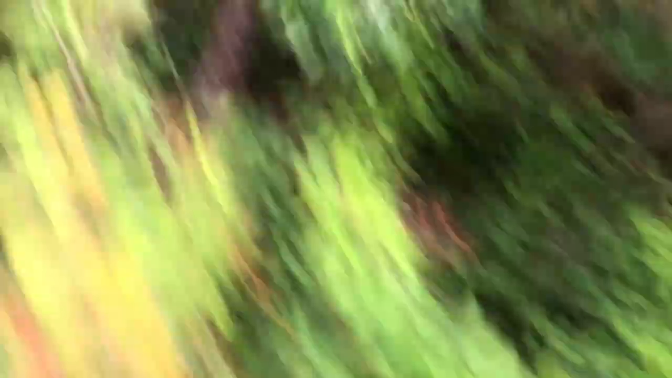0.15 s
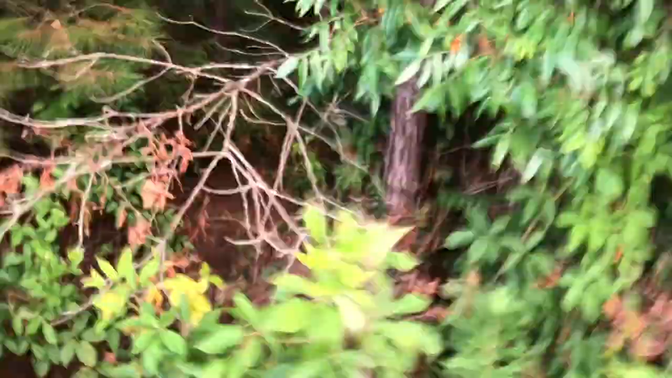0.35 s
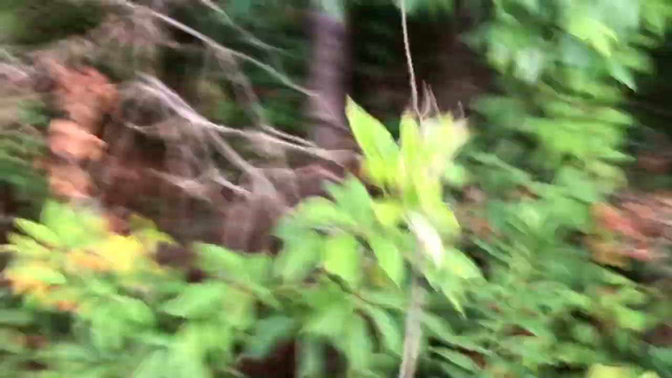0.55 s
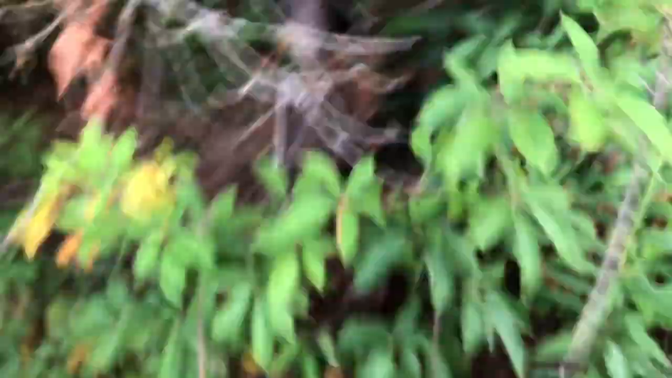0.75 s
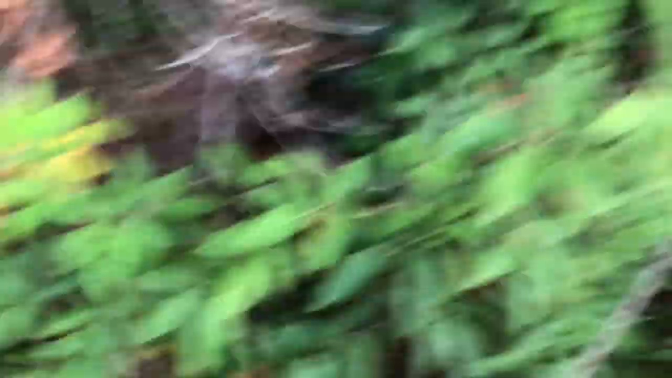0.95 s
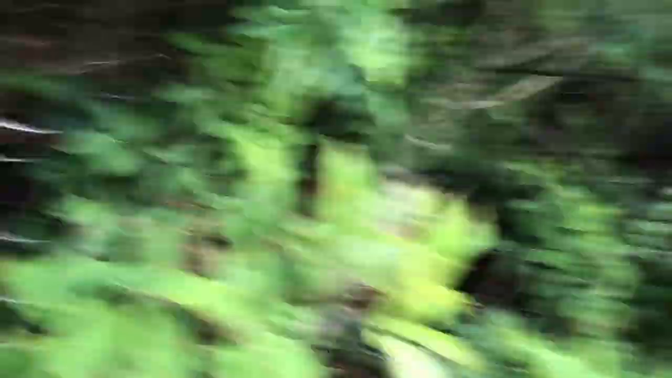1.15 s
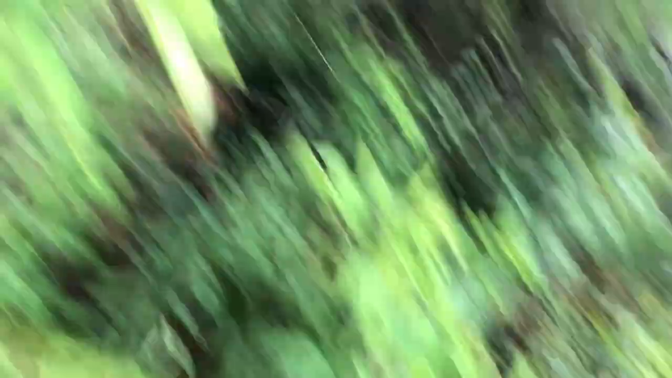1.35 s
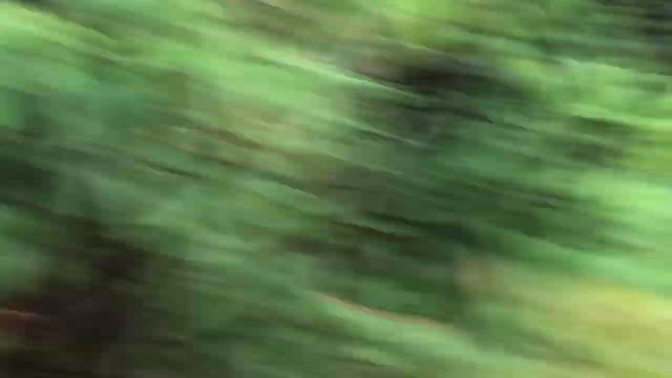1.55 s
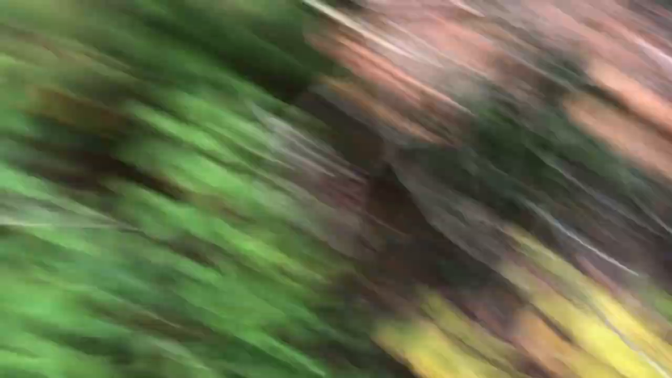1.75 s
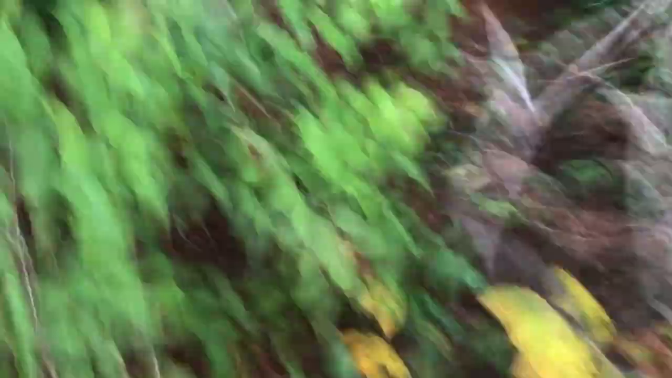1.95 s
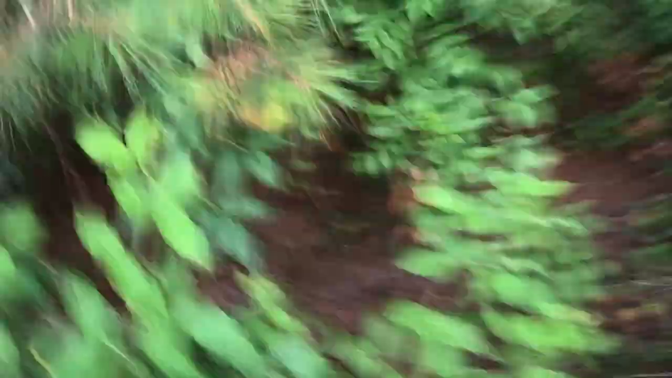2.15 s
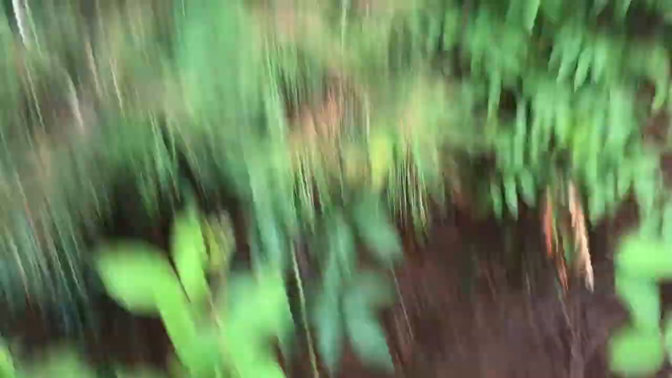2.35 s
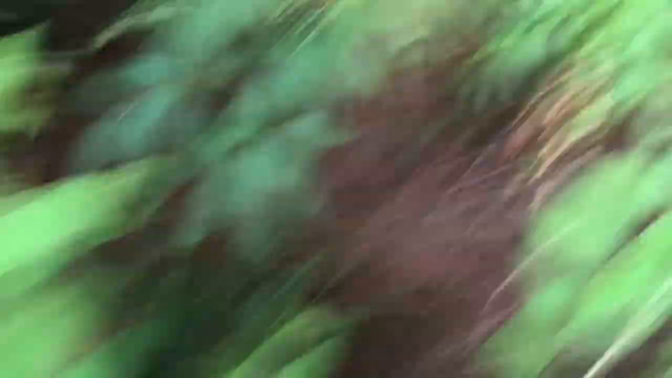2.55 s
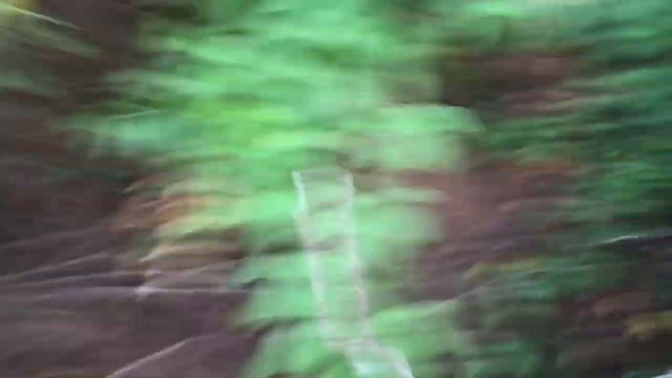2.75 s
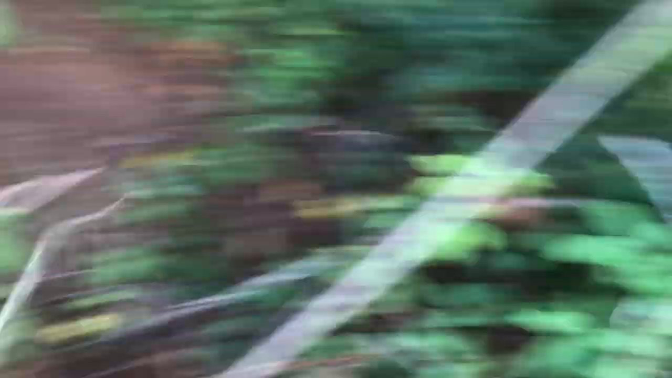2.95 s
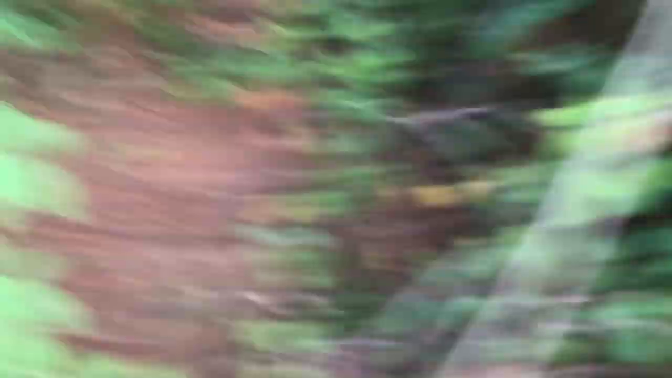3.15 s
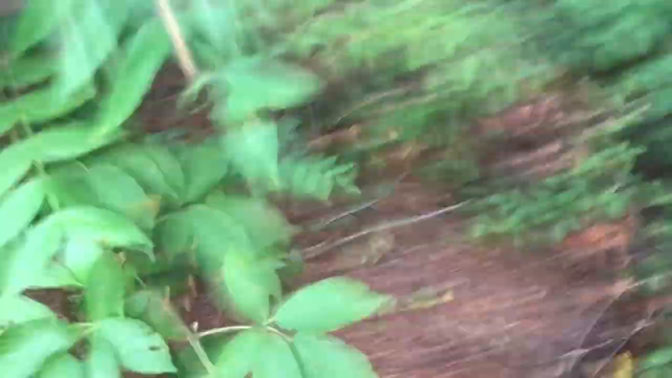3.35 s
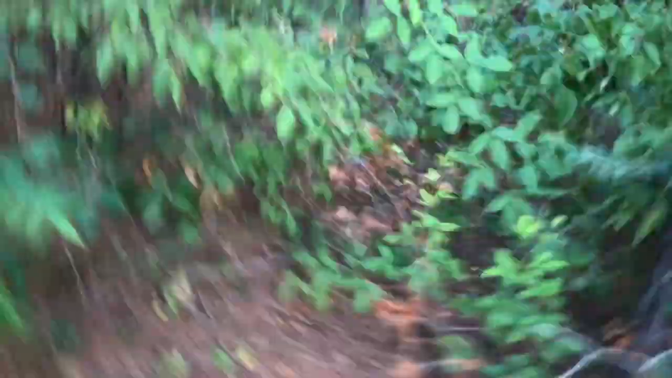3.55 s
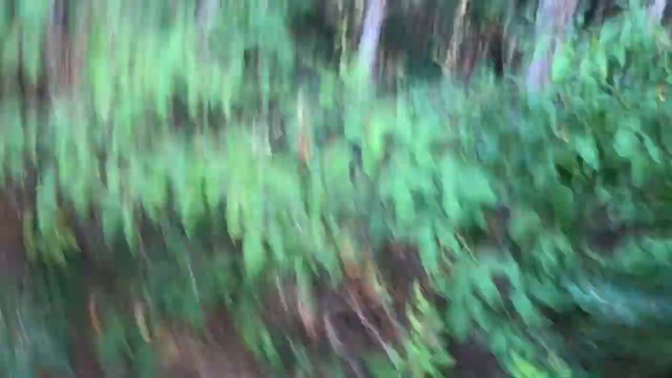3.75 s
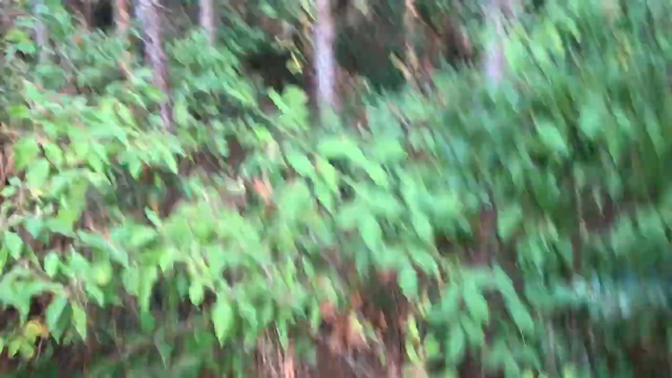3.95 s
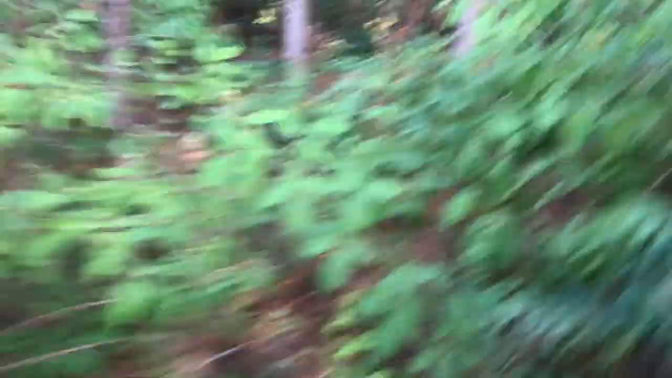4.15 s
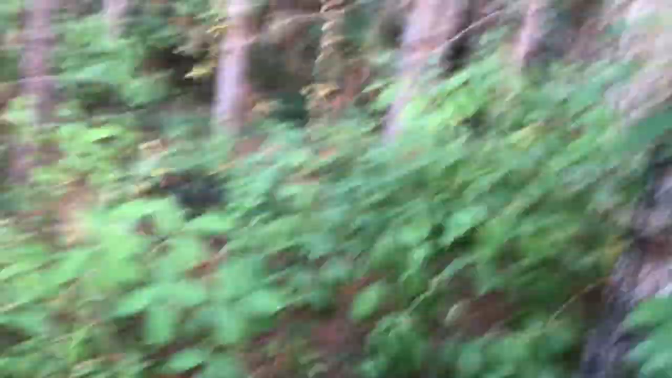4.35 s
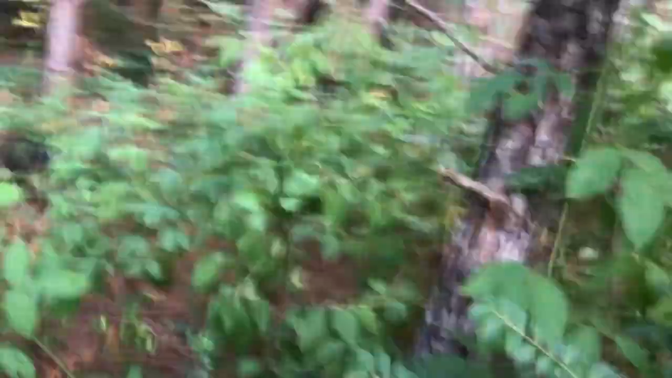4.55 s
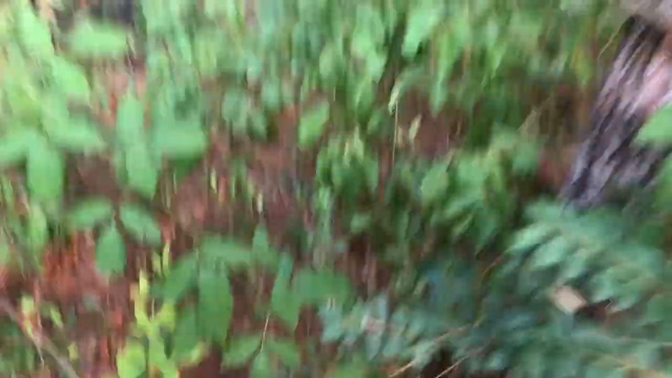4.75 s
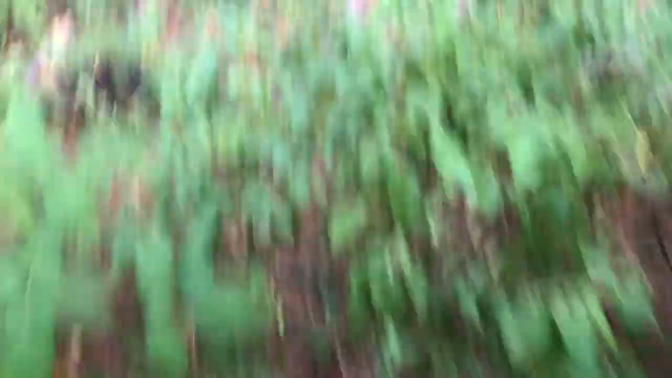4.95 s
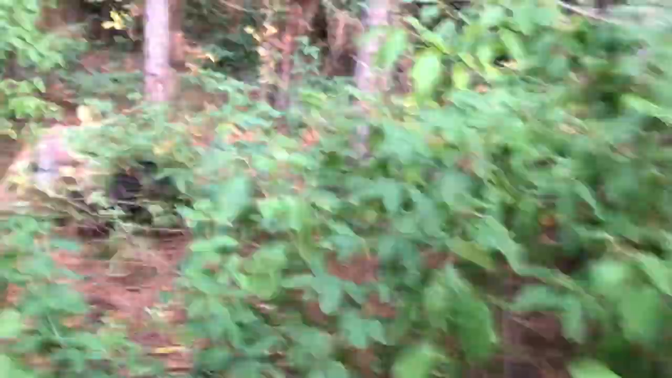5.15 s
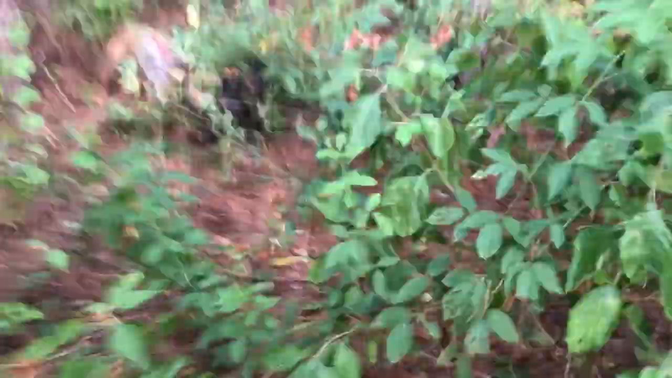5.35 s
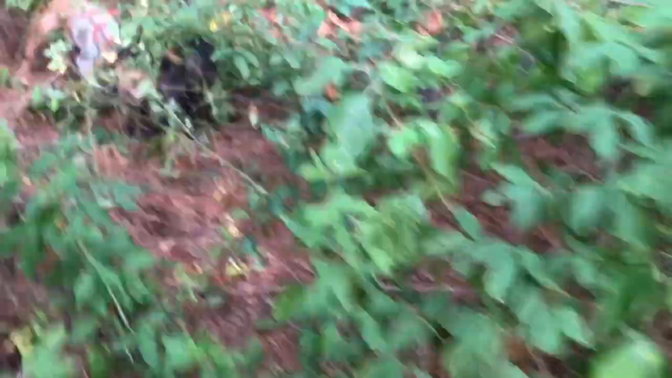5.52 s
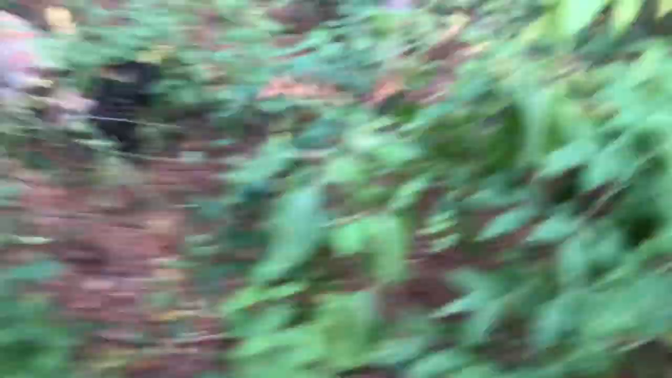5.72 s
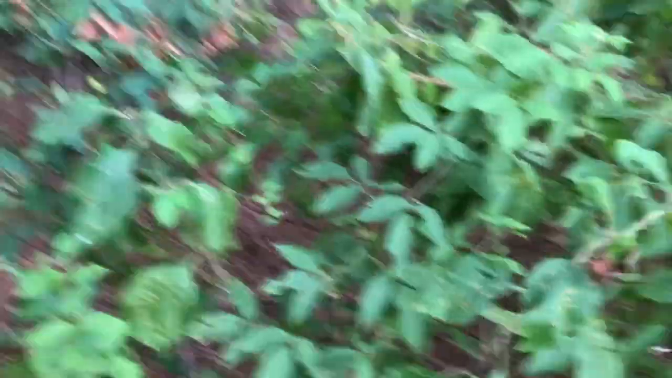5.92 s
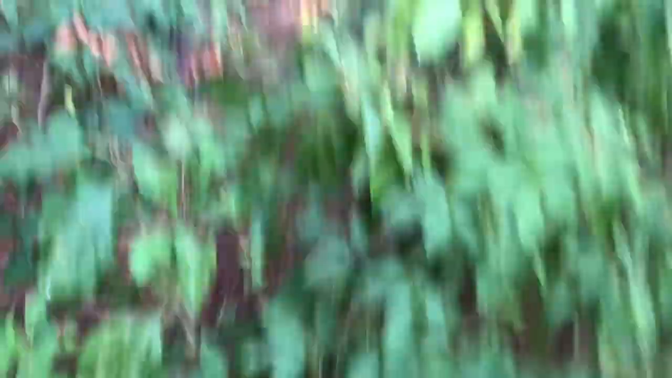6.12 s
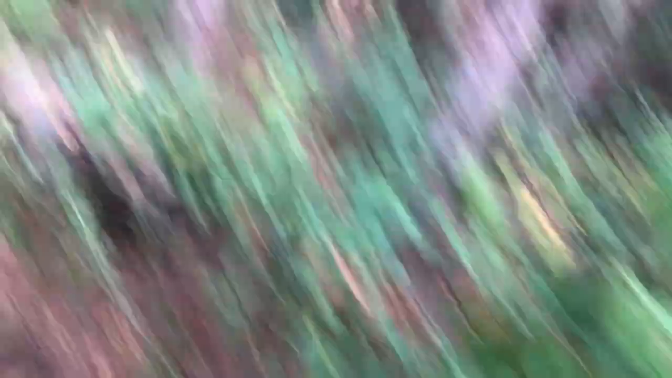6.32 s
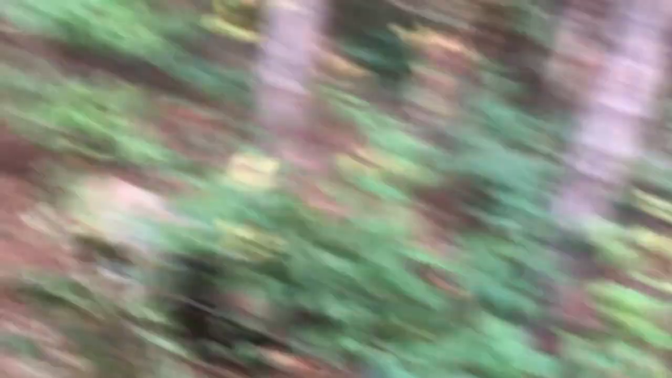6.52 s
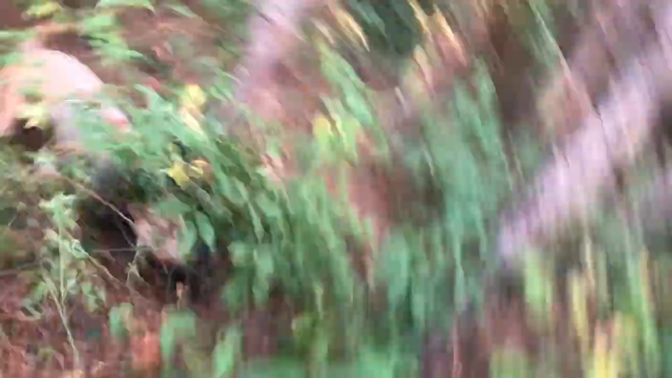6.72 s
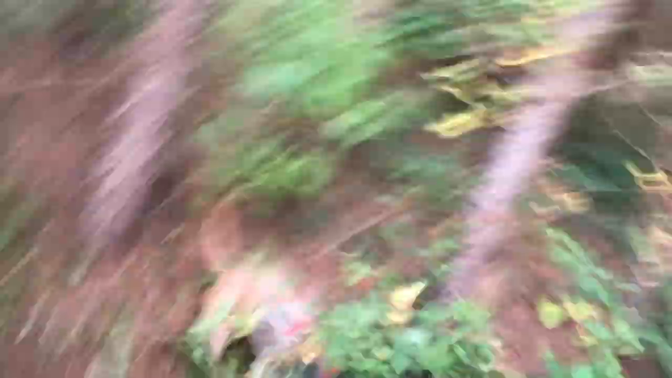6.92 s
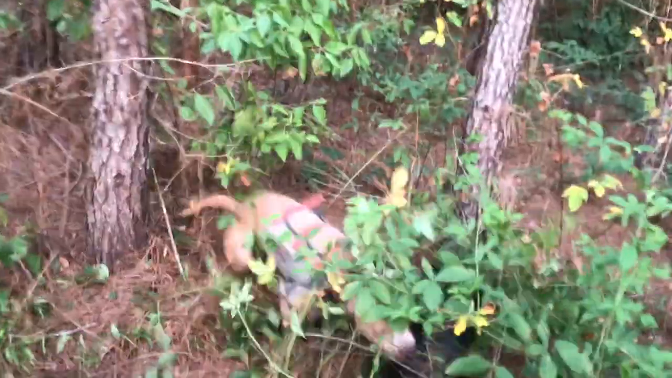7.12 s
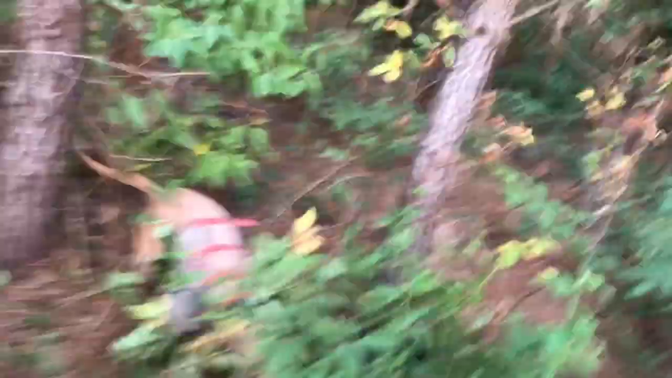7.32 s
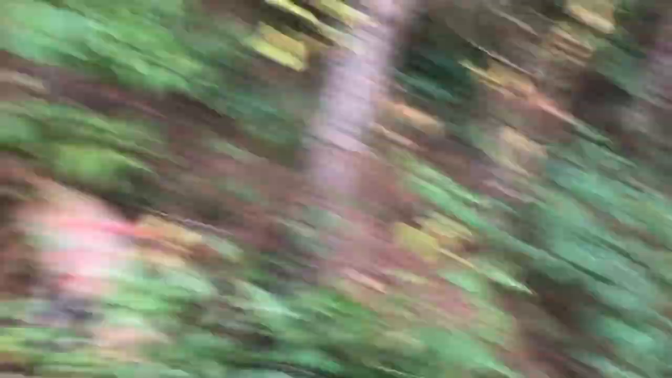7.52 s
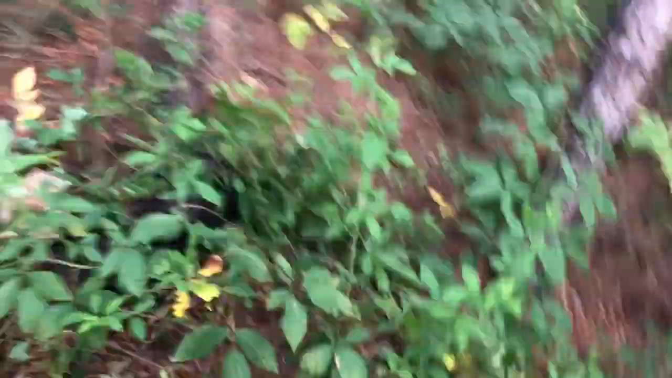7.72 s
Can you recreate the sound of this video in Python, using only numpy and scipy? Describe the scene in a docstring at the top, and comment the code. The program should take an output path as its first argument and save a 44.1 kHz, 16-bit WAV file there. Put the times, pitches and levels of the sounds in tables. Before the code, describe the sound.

Outdoors in a wood, someone pushes through leafy undergrowth with swishes, sharp snaps and low thuds near the microphone. A little further off a held pig screams in four long bursts, a shrill whistle roughened by fluttering rasp and breath. The cries grow more intense, the brush noise thins out, and the last squeal is still going at the end. Faint reflections come off the trunks.

```python
"""The harsh tail of a cry and the rustle of brush come first, then snapping twigs, dull knocks and low thuds.
A held wild hog squeals four more times in a wood: a high whistle of the vocal folds beats against a
slower, uneven flutter, over breath noise shaped by throat resonances. Slow fold slaps open the third squeal.
Brush is shaped noise and small clicks, snaps are noise bursts, knocks are short decaying sines;
sparse taps echo the hog off the trunks."""
import sys
import numpy as np
from scipy import signal
from scipy.fft import rfft, irfft
from scipy.io import wavfile
from scipy.ndimage import uniform_filter1d

SR = 44100
rng = np.random.default_rng(int(sys.argv[2]) if len(sys.argv) > 2 else 0)


def generate_wav(sig):
    """Save sig (samples, or channels by samples) to the path in sys.argv[1] as 16-bit PCM at SR."""
    pcm = np.round(np.clip(np.atleast_2d(sig).T, -1, 1) * 32767).astype(np.int16)
    wavfile.write(sys.argv[1], SR, pcm)


N = 347508  # length in samples

# Tail of an earlier cry, then the four squeals, one table each:
# [t/s, whistle f/Hz, whistle level/dB, breath effort level/dB, jaw resonance level/dB over effort]
SQUEAL_TABLES = [
    [(0.0, 2300, -60, -34.5, -21), (0.05, 2310, -63, -40.5, -18), (0.1, 2280, -70, -52, -10)],
    [(0.27, 2096, -65, -52, -2), (0.32, 2200, -58, -32.5, -17), (0.38, 2374, -46, -33, -6),
     (0.56, 2482, -28.5, -32.5, -27), (0.62, 2497, -23.5, -37, -6), (0.77, 2443, -23.5, -24, -18.5),
     (0.98, 2333, -18.5, -25, -7.5), (1.06, 2407, -19.5, -27.5, -7.5), (1.18, 2400, -23, -29, -9.5),
     (1.29, 2446, -25, -26, -13.5), (1.35, 2430, -31.5, -27, -18), (1.49, 2436, -22.5, -29.5, -10.5),
     (1.6, 2395, -19.5, -30, -16), (1.68, 2400, -26, -24, -11), (1.81, 2476, -23.5, -31, -10),
     (2.05, 2511, -24, -30.5, -9), (2.118, 2317, -22, -29, -13), (2.148, 1848, -23, -44, -10),
     (2.165, 1806, -68, -52, -14)],
    [(2.44, 1350, -45, -33, -19), (2.498, 1947, -19.5, -25.5, -31), (2.545, 2270, -30, -24.5, -24),
     (2.6, 2490, -28, -26.5, -17), (2.79, 2382, -27.5, -25.5, -7.5), (2.938, 2336, -18.5, -26, -14),
     (3.05, 2361, -24, -26.5, -13.5), (3.2, 2304, -16.5, -23.5, -18), (3.232, 2438, -17, -20, -15),
     (3.28, 2290, -10, -19.5, -10.5), (3.36, 2345, -23, -23.5, -11), (3.39, 2476, -24, -22, -13),
     (3.49, 2440, -22, -20, -17), (3.546, 2238, -14.5, -17, -21), (3.65, 2308, -18.5, -18.5, -19.5),
     (3.75, 2434, -16, -20, -19.5), (3.96, 2079, -14, -19.5, -16.5), (4.04, 2249, -15.5, -17, -16),
     (4.15, 2446, -24, -19.5, -15.5), (4.22, 2350, -19.5, -16.5, -10.5), (4.39, 2407, -18, -18.5, -16),
     (4.45, 2314, -33.5, -36, -6)],
    [(4.806, 1490, -50, -34, -12), (4.82, 1590, -27, -27, -20), (4.86, 2020, -38, -22, -23),
     (4.948, 2290, -25.5, -22, -21), (5.0, 2216, -23, -19, -16), (5.06, 2156, -11, -15, -11.5),
     (5.13, 2215, -19, -16, -10.5), (5.21, 2157, -10.5, -17, -9), (5.32, 2212, -15.5, -18.5, -10),
     (5.4, 2357, -24, -13.5, -15.5), (5.58, 2379, -21, -19, -12.5), (5.74, 2350, -11, -15.5, -11.5),
     (5.775, 2130, -16, -15, -11), (5.8, 2114, -11, -15, -9.5), (5.88, 2316, -16, -12.5, -9.5),
     (5.945, 2140, -14.5, -12.5, -16), (5.97, 2220, -15, -13, -13), (6.0, 2100, -8.5, -13.5, -17.5),
     (6.04, 2274, -15.5, -13, -9), (6.2, 2452, -11.5, -14, -10.5), (6.3, 2314, -14.5, -11.5, -5.5),
     (6.334, 1934, -15.5, -19, -9), (6.35, 1487, -30, -27, -11), (6.37, 1200, -50, -42, -20)],
    [(6.63, 1700, -63, -42, -15), (6.66, 1700, -51, -24.5, -26), (6.7, 1632, -24, -18, -28),
     (6.72, 1737, -13, -14.5, -32), (6.78, 2080, -22, -16, -32), (6.88, 2239, -14, -16, -17),
     (6.96, 2290, -16, -20.5, -9), (7.09, 2365, -10.5, -17, -13.5), (7.144, 2303, -29, -17, -13),
     (7.17, 2287, -11, -15, -18), (7.26, 2238, -15.5, -15, -15.5), (7.33, 2195, -13.5, -15.5, -10),
     (7.396, 2194, -7, -14, -15), (7.45, 2235, -23.5, -13.5, -14), (7.57, 2293, -10, -13.5, -11.5),
     (7.88, 2245, -14, -13.5, -8.5)],
]
# Centre pitch of the slower oscillator: [t/s, f/Hz]
FLUTTER_PITCH = [(0.33, 630.5), (0.75, 715), (1.4, 689), (1.85, 619), (2.16, 580), (2.46, 615), (2.7, 680),
                 (3.1, 640), (3.5, 709.5), (4.0, 720.6), (4.44, 644.6), (4.83, 619), (5.0, 690.3),
                 (5.7, 659.4), (6.05, 716), (6.36, 659.2), (6.69, 610), (7.0, 685.2), (7.88, 634.6)]
# Chest resonance in each cry: [level/dB over effort at the start, later level/dB over effort, fade t/s]
CHEST_FADES = [(-10, -12, .1), (-6, -20, 0.28), (-16, -23.5, 0.31), (-11, -21, 0.31), (-7.5, -18, 0.34)]
# Mouth and rasp resonances: [t/s, mouth level/dB over effort, rasp level/dB over effort]
MOUTH_AND_RASP = [(0.0, -7, -11), (0.35, -3, -8), (0.58, 3, -8.5), (0.77, -9, -10), (1.0, -1.5, -5.5),
                  (1.2, -1.5, -5.5), (1.35, -6.5, -11), (1.6, -0.5, -10.5), (1.7, -4, -11.5),
                  (1.85, 3.5, -10), (2.0, 1.5, -5.5), (2.13, -8, -9.5), (2.5, -9, -8.5), (2.62, -2, -6.5),
                  (3.1, -5.5, -9), (3.6, -10, -12.5), (3.9, -7, -8.5), (4.14, -9.5, -7), (4.4, -4, -8),
                  (4.82, -1, -4.5), (4.9, -9.5, -5.5), (5.1, -5.5, -9), (5.3, -2.5, -2),
                  (5.42, -11.5, -9.5), (5.82, -5, -4.5), (5.9, -9.5, -9.5), (6.32, -10.5, -9),
                  (6.64, -7, -12.5), (6.8, -8, -10), (7.0, 0, -1), (7.26, -11, -1.5), (7.88, -12.5, -8)]
# Tones where the two oscillators mix: [multiple of whistle, multiple of flutter, relative level/dB]
MIXING_TONES = [(0, 1, -1), (1, -2, -4), (1, -1, -2.5), (1, 1, -1), (1, 2, -18)]
# Resonances that colour the breath: [f/Hz, width of each pass f/Hz, relative level/dB]
# All but the chest modes shift with the whistle pitch and are listed for a 2350 Hz whistle.
CHEST_MODES = [(737, 130, -6.), (1018.5, 117, -2), (1170, 1160, -9)]
MOUTH_MODES = [(1940, 300, 14.3), (1932, 610, 14), (2290, 50, 2.5)]
HEAD_MODES = [(2959, 710, 8), (3800, 320, -19)]
RASP_MODES = [(4585, 1170, 5), (5580, 1230, 1.5), (7300, 2150, 1), (10850, 4900, -5.5),
              (13200, 6800, -12.5)]
# Swish of leaves round the walker, one table a stretch: [t/s, level/dB]
LEAF_SWISH = [
    [(0.0, -53), (0.14, -38), (0.29, -42.5), (0.77, -40), (0.88, -31), (1.29, -40), (2.04, -37),
     (2.15, -36.5), (2.31, -47), (2.42, -34), (2.55, -37), (3.27, -35.5), (3.4, -35)],
    [(4.46, -52), (4.654, -47), (4.8, -55)],
    [(6.39, -46), (6.62, -46.5)],
]
# Spectrum of the low noise: [f/Hz, relative level/dB]
LOW_SPECTRUM = [(15, -53), (25, -16), (65, -4), (271, 1), (592, -0.5), (920, -3), (1430, -6), (1680, -9.5),
                (3000, -11), (3900, -59), (6600, -120)]
# Spectrum of the leaf hiss: [f/Hz, relative level/dB]
SWISH_SPECTRUM = [(180, -30), (300, -31), (574, -38), (774, -26), (946, 2), (1230, 0.5), (3760, 4.5),
                  (7080, -1.5), (16000, -17)]
# Low thuds and swells, one of them under the croak:
# [t/s of the peak, level/dB, t/s from the peak to 1/e amplitude]
LOW_SWELLS = [(0.152, -33, 0.087), (0.276, -33.5, 0.028), (0.856, -30.5, 0.045), (1.01, -30, 0.092),
              (1.419, -38, 0.023), (1.53, -46, .04), (1.841, -39, 0.039), (1.998, -38.5, 0.039),
              (2.391, -40.5, .08), (3.47, -43, 0.055), (3.93, -48, 0.091), (4.56, -45, 0.061),
              (4.78, -39.5, 0.088), (5.53, -37, 0.14), (6.345, -36.5, .025), (6.67, -34.5, 0.066),
              (6.87, -36.5, .1), (7.571, -41, .12)]
# Twigs and leaves that snap: [t/s, crack peak level/dB, woody body level/dB over the crack]
TWIG_SNAPS = [(0.0674, -33, 5), (0.0837, -35, 4), (0.119, -29, 7), (0.1400, -26, 8), (0.1594, -31, 5),
              (0.2428, -25, -8), (0.5147, -25, -6), (0.5543, -20.5, -8), (0.7035, -31, -6),
              (0.719, -18, -8), (0.754, -12, -6), (0.8009, -14, -8), (0.9765, -33, -3), (1.0434, -32, -3),
              (2.2369, -20, -10), (2.295, -28, -3), (2.378, -16, -12), (2.4045, -21, -4), (2.412, -20, -6),
              (2.4323, -19, -8), (2.4868, -19, -4), (2.558, -18, -4), (2.632, -7, -4), (2.6548, -12, -7),
              (3.212, -14, -4), (3.2433, -11, -2), (4.634, -37, -5), (4.6523, -27, -5)]
# Dull knocks against the hand and underfoot: [t/s, level/dB before onset and decay, f/Hz]
DULL_KNOCKS = [(0.109, -25, 430), (0.139, -20, 440), (0.159, -15.5, 257), (0.269, -25, 392),
               (0.938, -21, 257), (1.119, -28, 380), (1.167, -25, 510), (1.719, -23.5, 70.1),
               (2.099, -30, 53.7), (2.319, -32, 502), (2.382, -34, 223), (3.689, -25, 66.3),
               (4.559, -26, 280), (6.36, -32, 113.9)]
# Throat modes rung by the fold slaps: [centre f/Hz, width f/Hz, centre level/dB, relative]
CROAK_MODES = [(189.7, 55, 1.5), (640, 90, 4.5), (1700, 180, 12.5), (2753, 290, 12), (4450, 180, 3)]

FLUTTER_DRIFT_HZ, THROAT_SWAY_DB = 20, 0.5  # both rms
FLOOR_DB = -48  # steady far rustle of the wood
RUMBLE_DB, RUMBLE_DB_PER_S = -41, -1.0  # sinks as the walker slows
SNAP_T60_S, KNOCK_T60_S = 0.053, 0.041
# The gaps between slaps shorten by CROAK_QUICKENS_S each time.
CROAK_S, CROAK_COUNT, CROAK_GAP_S, CROAK_QUICKENS_S = 4.7215, 8, 0.0128, 0.0004
# The first slap is weak; the shortfall in dB is multiplied by CROAK_RISE at each slap.
CROAK_DB, CROAK_FIRST_DB, CROAK_RISE = -16, -1.5, 0.2
EDGE_HZ = 15830  # top of the band


def amp(db):
    """Turns decibels into an amplitude factor."""
    return 10 ** (np.asarray(db) / 20)


def evened(x):
    """Scales a signal to rms 1."""
    return x / np.sqrt(np.mean(x ** 2) + 1e-20)


def add(mix, s, sound):
    """Lays a sound into the mix at s seconds, cut at the end of the scene."""
    part = mix[round(s * SR):][:len(sound)]
    part += sound[:len(part)]


def columns(rows):
    """Joins table rows by straight lines over the whole scene; also a 0-1 window over the rows."""
    s, *values = np.transpose(rows)
    t = np.arange(N) / SR
    on = np.clip(np.minimum(t - s[0], s[-1] - t) / 0.0011, 0, 1)  # 1.1 ms edges
    return [on] + [np.interp(t, s, v) for v in values]


def joined(tables):
    """Lays several tables end to end, with lines across the gaps and a window over each table."""
    on = sum(columns(rows)[0] for rows in tables)
    return [on] + columns(sum(map(list, tables), []))[1:]


def wander(hz):
    """Random drift of rms 1 with most of its motion under hz."""
    r = np.exp(-2 * np.pi * hz / SR)
    return evened(signal.lfilter([1], [1, -2 * r, r * r], rng.standard_normal(N)))


def resonate(x, hz, width):
    """A resonance applied twice: shifts the curve hz to zero, lowpasses, then shifts back."""
    turn = np.exp(2j * np.pi * np.cumsum(hz * np.ones(len(x))) / SR)
    r = np.exp(-np.pi * width / SR)
    return 2 * (turn * signal.lfilter([(1 - r) ** 2], [1, -2 * r, r * r], x / turn)).real


def through(x, modes, stretch=1):
    """Sums resonances of alternating sign, each at its own level, to rms 1 overall."""
    total = 0
    for k, (hz, width, db) in enumerate(modes):
        total = total + (-1) ** k * amp(db) * evened(resonate(x, hz * stretch, width))
    return evened(total)


def coloured(x, points):
    """Shapes x by a spectrum drawn on a log-frequency axis."""
    hz, db = np.transpose(points)
    f = np.fft.rfftfreq(len(x), 1 / SR)
    return irfft(rfft(x) * amp(np.interp(np.log(f + 1), np.log(hz), db)), len(x))


def patchy(x, depth_db, bins, frames):
    """Random patches of gain over time and frequency, depth_db rms."""
    z = signal.stft(x, nperseg=512, noverlap=384)[2]
    field = rng.standard_normal(z.shape[::-1]).T
    for _ in range(2):
        field = uniform_filter1d(uniform_filter1d(field, bins, 0), frames, 1)
    return signal.istft(z * amp(depth_db * evened(field)), nperseg=512, noverlap=384)[1][:N]


def throat():
    """Swaying levels of chest, mouth and rasp over the breath effort, and the flutter pitch."""
    t = np.arange(N) / SR
    starts = np.array([rows[0][0] for rows in SQUEAL_TABLES])
    cry = np.searchsorted(starts, t, "right") - 1
    first_db, later_db, fade_s = np.array(CHEST_FADES)[cry].T
    chest_db = later_db + (first_db - later_db) * np.exp(-((t - starts[cry]) / fade_s) ** 2)
    flutter_hz = columns(FLUTTER_PITCH)[1] + FLUTTER_DRIFT_HZ * wander(hz=3)
    # each part swells and sinks on its own
    levels = [db + THROAT_SWAY_DB * wander(hz=6.7) for db in [chest_db] + columns(MOUTH_AND_RASP)[1:]]
    return levels + [flutter_hz]


def squeal():
    """Two oscillators and their mixing tones, over breath noise puffed at the flutter rate."""
    on, hz, whistle_db, effort_db, jaw_db = joined(SQUEAL_TABLES)
    chest_db, mouth_db, rasp_db, flutter_hz = throat()

    # the whistle frays now and then; the flutter jitters steadily
    fray_hz = 24 * amp(3 * wander(hz=4)) * wander(hz=70)
    fast = 2 * np.pi * np.cumsum(hz + fray_hz) / SR
    uneven_hz = 34 * wander(hz=35)
    slow = 2 * np.pi * np.cumsum(flutter_hz + uneven_hz) / SR

    shake_db = 2.6 * wander(hz=50) - 4 * np.maximum(wander(hz=10), 0)
    octave_db = -31 + 5 * wander(hz=12)
    whistle = amp(whistle_db + shake_db) * (np.sin(fast) + amp(octave_db) * np.sin(2 * fast))

    part_db = [chest_db, jaw_db, mouth_db, 0, 0]  # the part of the throat that carries each tone
    mixing = 0
    for (m, n, db), part in zip(MIXING_TONES, part_db):
        flicker_db = 1.804 * wander(hz=48)
        breaks_db = -5.5 * np.maximum(wander(hz=7), 0)
        mixing = mixing + amp(db + part + flicker_db + breaks_db) * np.sin(m * fast + n * slow)
    mixing = mixing * np.clip((hz - 1500) / 600, 0.3, 1)  # weaker coupling at low pitch

    overtones = sum(np.cos(m * fast) * amp(3.4 * wander(hz=29.2)) for m in range(2, 7))
    tearing = evened(overtones * (0.39 + np.cos(slow) + 0.35 * np.cos(2 * slow)))
    breath = rng.standard_normal(N) * (1 + 0.15 * np.cos(slow)) * amp(0.5 * wander(hz=30.4))
    torn = breath + 0.55 * tearing

    # the throat tightens as the pitch rises, the mouth most
    tremble = 1 + 0.014 * wander(hz=10)
    stretch = (hz / 2350) ** 0.3 * tremble
    mouth_stretch = stretch * (hz / 2350) ** 0.5
    noise = through(breath, HEAD_MODES, stretch) * amp(-2.0)
    noise += through(breath, MOUTH_MODES, mouth_stretch) * amp(mouth_db)
    noise += through(breath, CHEST_MODES[:1]) * amp(chest_db - 3.5)
    noise += through(breath, CHEST_MODES[1:]) * amp(jaw_db - 3.0)  # upper chest modes follow the jaw
    noise += patchy(through(torn, RASP_MODES, stretch), 2.86, bins=6, frames=14) * amp(rasp_db)

    tones = np.sqrt(2) * (whistle + amp(effort_db) * mixing)
    voice = on * (tones + amp(effort_db) * noise)
    # clears out what lies below the flutter
    return signal.sosfilt(signal.butter(8, 580, "high", fs=SR, output="sos"), voice)


def low_level():
    """Level of the low noise: thuds and swells rise and fade over a slowly sinking rumble."""
    t = np.arange(N) / SR
    swells = sum(amp(db) ** 2 * np.exp(-2 * ((t - s) / length) ** 2) for s, db, length in LOW_SWELLS)
    return np.sqrt(swells + amp(RUMBLE_DB + RUMBLE_DB_PER_S * t) ** 2)


def brush():
    """Lumpy low noise and a hiss of leaves thick with small random clicks."""
    swish_db = joined(LEAF_SWISH)[1]
    lumps = patchy(rng.standard_normal(N), 1.8, bins=2, frames=8)
    click_db = 3.5 * np.minimum(rng.exponential(1, N), 5)
    strikes = rng.random(N) < 300 / SR  # about 300 a second
    clicks = amp(click_db) * strikes * rng.choice([-1, 1], N)
    gusts = patchy(rng.standard_normal(N), 2.6, bins=30, frames=6)
    leaves = gusts + 0.62 * evened(clicks)
    low = low_level() * evened(coloured(lumps, LOW_SPECTRUM))
    hiss = np.hypot(amp(swish_db), amp(FLOOR_DB)) * evened(coloured(leaves, SWISH_SPECTRUM))
    return low + hiss


def wood(x, t60, dull_hz):
    """Trunks scatter the cry back: sparse taps of random sign that die away, treble lost."""
    taps = np.zeros(SR)
    at = np.arange(400, SR - 20, 20)  # one tap in every 20 samples
    taps[at + rng.integers(0, 20, len(at))] = rng.choice([-1., 1.], len(at))
    decay = amp(-60 * np.arange(SR) / SR / t60)
    taps = signal.lfilter(*signal.butter(2, dull_hz, fs=SR), taps * decay)
    return signal.fftconvolve(x, taps / np.linalg.norm(taps))[:N]


def snaps():
    """Each snap is a sharp tick with a broad noise burst behind it; each knock a short low ring."""
    t, out = np.arange(3000) / SR, np.zeros(N)
    bursts = rng.standard_normal((len(TWIG_SNAPS), len(t)))
    for (s, db, body_db), burst in zip(TWIG_SNAPS, bursts):
        decay = amp(-60 * t / 0.0017) + 0.55 * amp(-60 * t / SNAP_T60_S)  # tick, then tail
        crack = resonate(burst * decay, 4400, 6500)
        crack = np.diff(crack, prepend=0) + crack  # tilts to treble: thin twigs give little bass
        body = resonate(burst * amp(-60 * t / 0.016), 1880, 3100)  # thicker wood cracks lower
        add(out, s, amp(db) * (crack / abs(crack).max() + amp(body_db) * body / abs(body).max()))
    for s, db, hz in DULL_KNOCKS:
        onset = 1 - np.exp(-t / 0.001)
        add(out, s, amp(db - 60 * t / KNOCK_T60_S) * np.sin(2 * np.pi * hz * t) * onset)
    return out


def croak():
    """Single fold slaps, each with a puff of air, ring the throat modes."""
    t, out = np.arange(1300) / SR, np.zeros(N)
    for k, chance in enumerate(0.03 * rng.standard_normal((CROAK_COUNT, 200))):
        s = CROAK_S + k * CROAK_GAP_S - CROAK_QUICKENS_S * k * k / 2
        db = CROAK_DB + CROAK_FIRST_DB * CROAK_RISE ** k
        ring = np.zeros(len(t))
        # every slap varies each mode a little in level and pitch
        for (hz, width, level_db), a, b in zip(CROAK_MODES, chance, chance[10:]):
            decay = np.exp(-np.pi * width * t)
            ring += amp(level_db + 60 * a) * decay * np.sin(2 * np.pi * hz * (1 + b) * t)
        puff = 4.0 * chance * np.exp(-t[:200] / 0.008)
        slap = np.convolve(ring, (np.arange(200) == 0) + puff)
        add(out, s, amp(db) * slap / abs(slap).max())
    # a small throat gives no deep bass
    return signal.sosfilt(signal.butter(4, 150, "high", fs=SR, output="sos"), out)


def scene():
    """Hog with short bright and long dull echoes, and the walker dry in front."""
    hog = squeal() + croak()
    near = amp(-14.5) * wood(hog, t60=0.047, dull_hz=6900)
    far = amp(-28.0) * wood(hog, t60=0.55, dull_hz=2300)
    return (hog + near + far + brush() + snaps())[None]


def record(dry):
    """Softly squeezes loud peaks, cuts the deepest bass, then limits the band."""
    squeezed = 1.139 * np.tanh(dry / 1.29)
    thin = signal.lfilter(*signal.butter(2, 50, "high", fs=SR), squeezed)
    band = signal.firwin(1023, EDGE_HZ, window=("kaiser", 9), fs=SR)
    return signal.oaconvolve(thin, band[None], "same")


dry = scene()
out = record(dry)
generate_wav(out)
```